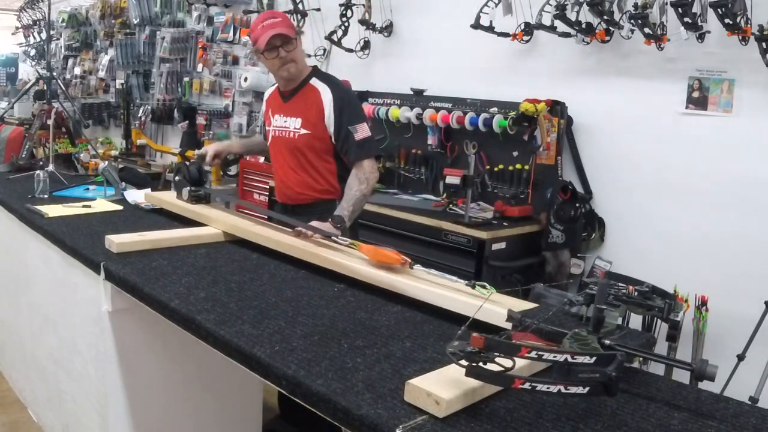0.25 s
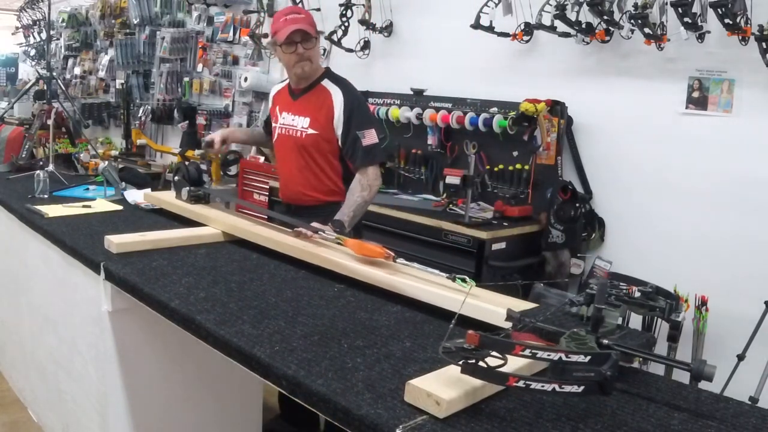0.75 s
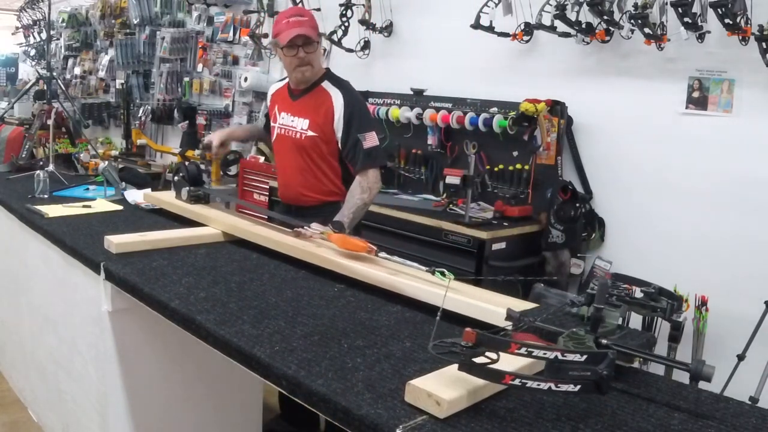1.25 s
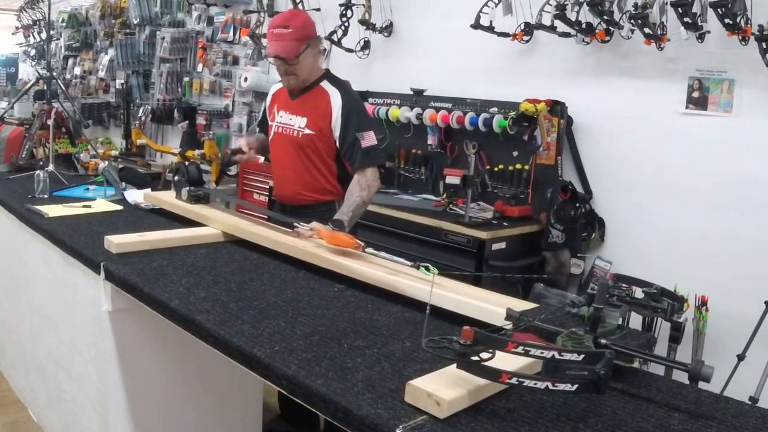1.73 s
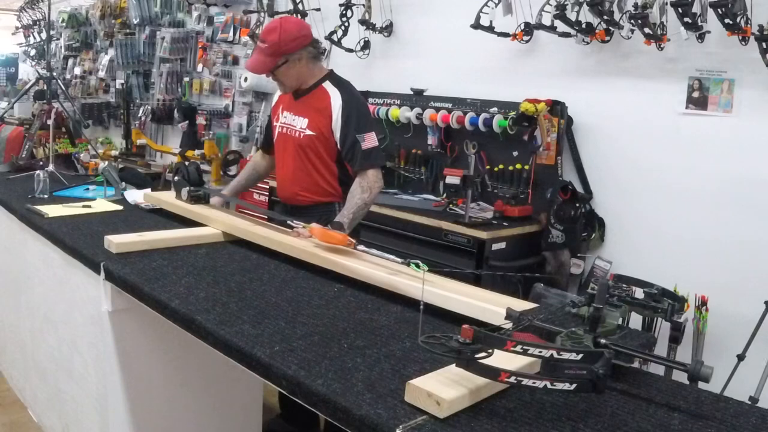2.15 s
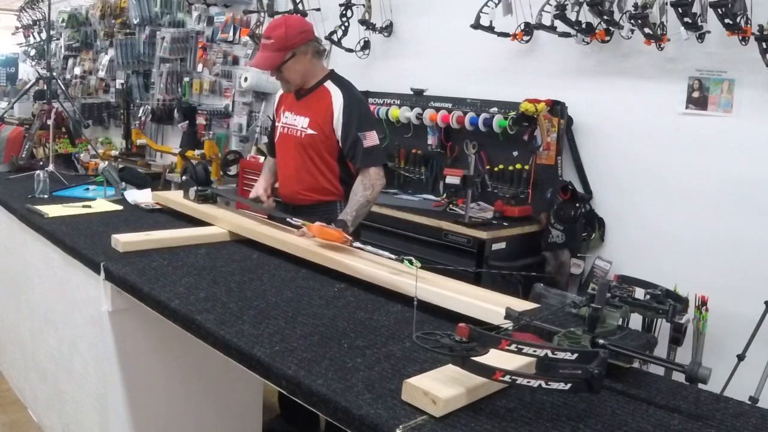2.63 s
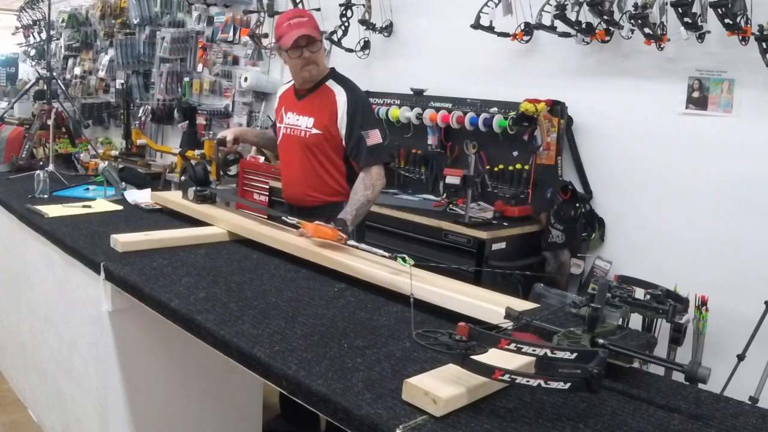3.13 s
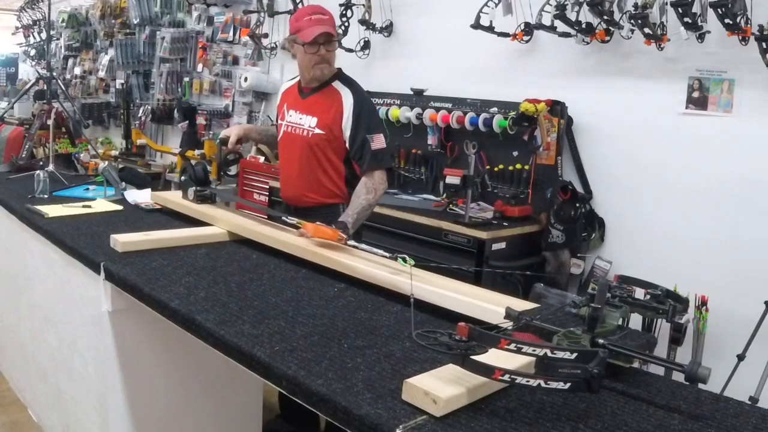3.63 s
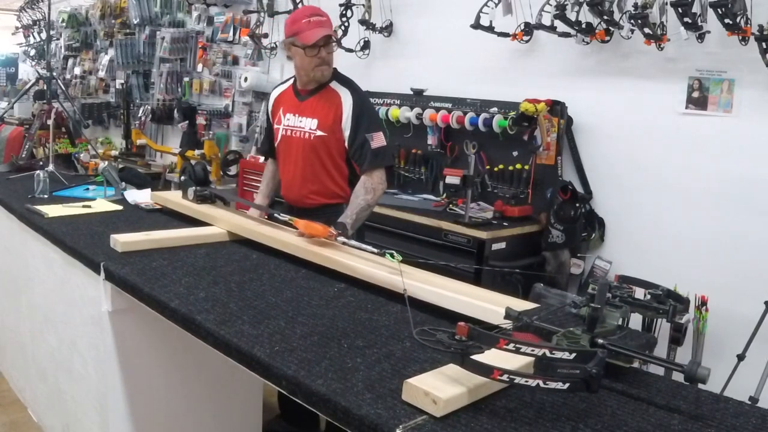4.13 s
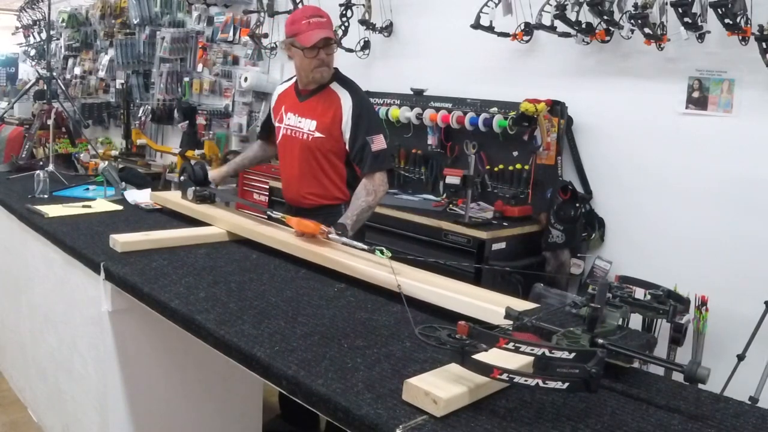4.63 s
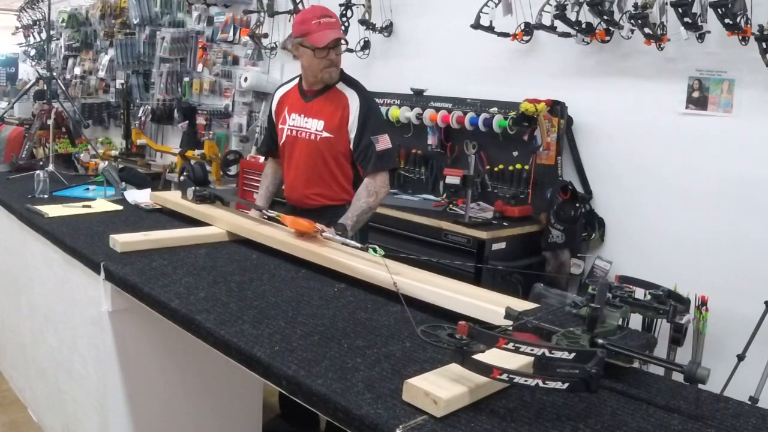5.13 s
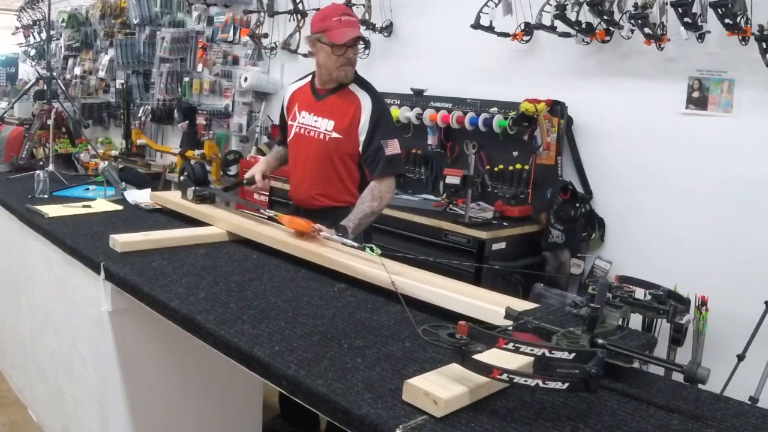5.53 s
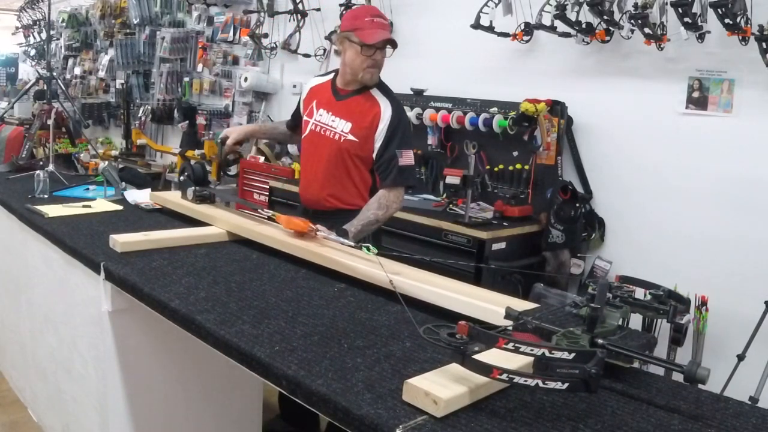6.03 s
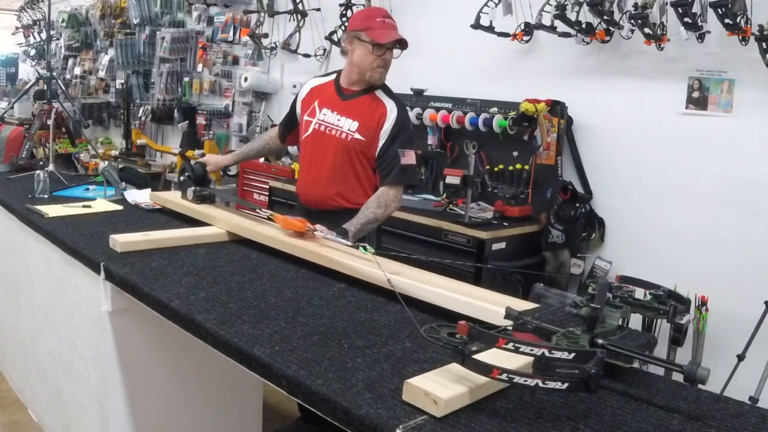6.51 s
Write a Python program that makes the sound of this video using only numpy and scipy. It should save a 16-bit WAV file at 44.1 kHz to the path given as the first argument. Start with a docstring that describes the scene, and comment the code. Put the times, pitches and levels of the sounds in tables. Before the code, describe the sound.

In a quiet workshop, a steel pawl snaps rapidly over the teeth of a hand-cranked winch. The bright, ringing clicks slacken and break off for a moment. Cranking resumes at a moderate pace, then grows steadily slower until each click stands alone, with soft knocks from the crank and the wooden base. The clicks sound clear, with a little room reverberation over a faint steady rumble and hiss.

```python
"""Hand winch drawing a bow

A winch on a wooden draw board in a workshop: quick cranking, a pause, then ever slower clicks.
At each tooth the pawl rubs up the flank and snaps down, ringing itself, the steel frame
and the board. Faster teeth hit harder, and each push of the hand deepens the knock.
The room answers every click over a faint ventilation rumble."""
import sys
import numpy as np
from scipy import signal
from scipy.fft import rfft, irfft, next_fast_len
from scipy.io import wavfile
from scipy.ndimage import uniform_filter1d

SR = 44100
rng = np.random.default_rng(int(sys.argv[2]) if len(sys.argv) > 2 else 0)


def unload_wav(signal):
    """Save mono or channel-first audio to the path in sys.argv[1] as 16-bit WAV at rate SR, clipped to [-1, 1]."""
    wavfile.write(
        sys.argv[1],
        SR,
        np.round(np.clip(np.atleast_2d(signal).T, -1, 1) * 32767).astype(np.int16),
    )


N = 298204
LEAD_S = 0.08
T = np.arange(SR // 2) / SR - LEAD_S  # time around one contact, s

DROPS = [(0.0231, 0.5, 1485), (0.093, 0.5, 1500), (0.156, 2.5, 1434), (0.2226, -2, 1456),
         (0.2903, 4.5, 1470), (0.3521, 3.5, 1403), (0.411, 1.5, 1447), (0.4608, 1, 1414),
         (0.506, 2.5, 1450), (0.5534, -2.5, 1480), (0.6064, 0, 1456), (0.6598, -8.5, 1540),
         (0.7127, -5.5, 1440), (0.76, -6.5, 1380), (0.8097, 2.5, 1440), (0.8645, 3.5, 1360),
         (0.9139, 2, 1360), (0.9577, -2.5, 1386), (0.9957, -2.0, 1280), (1.0396, -2.5, 1457),
         (1.0917, -1.5, 1390), (1.149, -5, 1480), (1.2042, 2.5, 1334), (1.2544, -6, 1496),
         (1.3111, 4, 1510), (1.3737, 0.5, 1364), (1.429, 3.0, 1445), (1.4819, 3.5, 1505), (1.5407, 3, 1436),
         (1.604, 4, 1543), (1.6622, -0.5, 1426), (1.7297, 0, 1566), (1.806, -2, 1470), (1.906, 3, 1440),
         (2.0184, -6.0, 1405), (2.115, -3.5, 1400), (2.203, 3.0, 1483), (2.3041, 3, 1493),
         (2.4806, -0.5, 1530), (2.6014, -0.5, 1560), (2.6917, -0.5, 1500), (2.78, -1, 1466),
         (2.9097, -1, 1470), (3.7597, 1.5, 1460), (3.8298, 2, 1474), (3.891, 1.5, 1470),
         (3.9528, 2.5, 1470), (4.0125, 2, 1477), (4.0954, 0.0, 1535), (4.1822, 2, 1382), (4.2693, -2, 1535),
         (4.365, 0.5, 1434), (4.435, -3.5, 1330), (4.5135, -3, 1450), (4.6, 0, 1462), (4.6862, -3, 1410),
         (4.7912, -0.5, 1430), (4.9365, 0.0, 1410), (5.1232, 2.5, 1377), (5.353, 1.5, 1510),
         (5.576, 2.5, 1403), (5.8303, 2, 1525), (6.0731, 2, 1446), (6.3352, 4.5, 1376), (6.624, 3.5, 1484)]  # pawl drops: t/s, ring level/dB, ring f/Hz
CLICK_EQ = [(400, -15), (900, -15), (1400, -16.5), (2600, -16), (5000, -17), (12000, -17.5)]  # click gain at the easy pace: f/Hz, level/dB
SPEED_EQ = [(600, 3), (1000, 3), (1500, 2.1), (2800, 0.56), (5000, 2.03), (10000, 0.97)]  # gain per doubling of tooth rate: f/Hz, level/dB
PUSH_SHARE = [(150, 0.66), (400, 0.97), (950, 0.94), (1350, 0.27)]  # weight of the hand's push: f/Hz, share
RING_SHARE = [(500, .2), (1000, 0.3), (1280, .9), (1650, 0.87), (2000, .15), (3000, 0.03)]  # weight of a drop's ring level: f/Hz, share
def ratchet(easy_teeth_per_s=10, push_db_per_rate=0.47):
    """One click a tooth: crank speed sets its weight, the way the pawl lands sets its ring."""
    # already turning: one tooth drops just before t = 0
    earlier = (2 * DROPS[0][0] - DROPS[1][0], *DROPS[0][1:])
    times, ring_db, ring_hz = np.transpose([earlier, *DROPS])
    count = len(times)
    rate = tooth_rate(times)[:, None]
    speed = np.log2(rate / easy_teeth_per_s)
    push_db = push_db_per_rate * (rate - uniform_filter1d(rate, size=7, axis=0))
    strike = pawl_strike(count)
    ring = later(amp(-7) * pawl_ring(ring_hz) + amp(-12) * frame_ring(count), 0.002)
    overtones = amp(-16.5) * shimmer(count)
    wall_echo = amp(-11.5) * later(strike, 0.019)
    clicks = strike + ring + overtones + wall_echo + amp(-9.5) * room(count)
    effort_db = lambda hz: speed * along(SPEED_EQ, hz) + push_db * along(PUSH_SHARE, hz)
    landing_db = lambda hz: ring_db[:, None] * along(RING_SHARE, hz)
    clicks = filtered(clicks, lambda hz: amp(along(CLICK_EQ, hz) + effort_db(hz) + landing_db(hz)))
    return place(times, clicks + board_hum(speed) + flank_rub(speed))


def pawl_strike(count):
    """The pawl lands: a short, rough rattle with a quick soft rise and a bright crack at its peak."""
    rattle = snap(count, rise_s=0.015, fall_s=0.047, spiky_db=2.5, scatter_db=2.5)
    rattle = coloured(rattle, [(5500, 0.5), (8000, -17.5)])
    crack = snap(count, rise_s=0.008, fall_s=0.014, spiky_db=2, scatter_db=4)
    crack = blow(coloured(crack, [(2000, -21), (5500, -3), (7500, -0.5)]))
    return amp(-8) * rattle + amp(-11) * crack


STEEL_SPECTRUM = [(60, -41.5), (300, -34.5), (800, -10), (2400, -12), (4000, -4), (5900, -16), (9000, -9),
                  (10700, -20), (15300, -22)]  # steel on steel: f/Hz, level/dB
WHEEL_PEAKS = [(430, 41, -4), (648.5, 47, 3), (900, 91, 3.5), (1070, 30, 6), (1440, 290, 6.5),
               (2165, 310, 6.5), (2490, 330, 1.5), (3240, 380, 0), (4480, 1200, -2.5), (6990, 870, -9.5),
               (8320, 600, -7), (12340, 790, -18)]  # ratchet wheel and mount: f/Hz, width/Hz, level/dB
def snap(count, rise_s, fall_s, spiky_db, scatter_db):
    """A burst of tiny impacts on the wheel; where they land favours one resonance or another."""
    shape = (count, len(T))
    impacts = rng.standard_normal(shape) * amp(spiky_db * rng.standard_normal(shape))
    favour_db = scatter_db * rng.standard_normal((count, len(WHEEL_PEAKS), 1))

    def wheel(hz):
        power = amp(along(STEEL_SPECTRUM, hz)) ** 2
        for k, (centre, width, db) in enumerate(WHEEL_PEAKS):
            peak = 1 / (1 + 2 * ((hz - centre) / width) ** 2)
            power = power + (amp(db + favour_db[:, k]) * peak) ** 2
        return np.sqrt(power)

    burst = impacts * swell(rise_s, fall_s)
    short = int(2 * LEAD_S * SR)
    sound = filtered(burst[:, :short], wheel)
    return blow(np.pad(sound, ((0, 0), (0, len(T) - short))))


PAWL_MODES = [(.78, -13, .05), (.93, -8, .036), (1.025, 0, .042), (5.85, -15, .05)]  # pawl: f/ring f, level/dB, t60/s
def pawl_ring(ring_hz):
    """The pawl rings briefly, at its own pitch for each drop."""
    tunings = [[(hz * ratio, db, t60) for ratio, db, t60 in PAWL_MODES] for hz in ring_hz]
    return np.vstack([modes(tuning, 1, rise_s=0.0037, scatter_db=2) for tuning in tunings])


FRAME_MODES = [(644, -9, .13), (711, -8, .14), (877, -8, .13), (915, -10, .13), (1080, -7, .13),
               (1139, -6, .13), (1286, 0, .17), (1345, -2, .16), (1412, 2, .23), (1485, -2, .28),
               (1560, 1, .17), (1674, -4, .16), (1807, -5, .16), (1943, -10, .3), (2008, -6, .18),
               (2150, -8, .16), (2313, -6, .24), (2374, -8, .29), (2476, -7, .33), (2551, -4, .19),
               (2754, -8, .23), (2993, -9, .17), (3400, -12, .19), (4205, -9, .18), (4414, -9, .26),
               (4866, -11, .23), (4995, -10, .23), (8387, -8, .22), (8480, -11, .22), (8950, -12, .17),
               (9300, -14, .2)]  # winch frame: f/Hz, level/dB, t60/s
def frame_ring(count):
    """The steel frame rings on after each strike."""
    return modes(FRAME_MODES, count, rise_s=0.013, scatter_db=4)


def shimmer(count, max_t60_s=0.25):
    """Thin overtones of gear, spring and drum, coloured and damped like the room's tail."""
    hz = rng.uniform(2200, 13000, size=90)
    t60 = np.minimum(max_t60_s, along(ROOM_DECAY, hz))
    overtones = np.transpose([hz, along(ROOM_SPECTRUM, hz), t60])
    return modes(overtones, count, rise_s=0.006, scatter_db=4)


BOARD_MODES = [(133, -7, 0.25), (202.6, -2.5, 0.31), (227.5, 1, 0.49), (246.3, -7, 0.38), (290, -13, .35),
               (401.5, 6, 0.08), (457.8, 3.5, 0.12)]  # wooden board: f/Hz, level/dB, t60/s
def board_hum(speed, full_draw_db=7):
    """The farther the bow is drawn, the better the taut cable passes each click into the board."""
    draw = np.linspace(0, 1, len(speed))[:, None]
    hum = later(modes(BOARD_MODES, len(speed), rise_s=0.02, scatter_db=2), 0.003)
    return amp(-42.5 + full_draw_db * draw ** 3 + 1.4 * speed) * hum


RUB_SPECTRUM = [(40, -6), (200, -8.5), (420, 5), (700, -6), (1300, 1), (2500, -21.5), (6000, -39),
                (15000, -53)]  # dull contact noise: f/Hz, level/dB
def flank_rub(speed):
    """The pawl rubs up the tooth's flank before it drops."""
    friction = noise(RUB_SPECTRUM, (len(speed), len(T)))
    fade_in = np.clip(1 + T / LEAD_S, 0, 1)
    return amp(-43.5 + speed) * blow(friction * swell(rise_s=0.2, fall_s=0.062) * fade_in)


CRANK_KNOCKS = [(0.962, -26, -49), (1.003, -32, -50), (2.566, -35, -51.5), (3.68, -54, -68),
                (3.728, -45, -60)]  # contacts in the crank: t/s, thud level/dB, tick level/dB
def crank_play(slow_teeth_per_s=6, ahead_s=0.049, db_per_doubling=16.5):
    """Play in the crank knocks and ticks; before slow teeth a slower hand takes it up more gently."""
    drops = np.transpose(DROPS)[0]
    take_ups = [(t - ahead_s, -45.5 + db_per_doubling * np.log2(rate / slow_teeth_per_s), -71)
                for t, rate in zip(drops, tooth_rate(drops)) if rate < slow_teeth_per_s]
    times, thud_db, tick_db = np.transpose([*CRANK_KNOCKS, *take_ups])
    count = len(times)
    thud = blow(noise(RUB_SPECTRUM, (count, len(T))) * swell(rise_s=0.039, fall_s=0.11))
    wood = amp(-9.5) * modes(BOARD_MODES, count, rise_s=0.022, scatter_db=0)
    tick = snap(count, rise_s=0.006, fall_s=0.05, spiky_db=2, scatter_db=2)
    return place(times, amp(thud_db[:, None]) * (thud + wood) + amp(tick_db[:, None]) * tick)


ROOM_SPECTRUM = [(40, -17.5), (150, -12), (420, -8.5), (550, -7.5), (800, -2.5), (1500, 4), (1850, 4),
                 (2300, 1.5), (3400, -6), (4700, -2), (5800, -7.5), (7600, -9), (8500, -5), (10700, -15.5),
                 (15300, -18)]  # workshop reverberation: f/Hz, level/dB
ROOM_DECAY = [(150, 0.9), (400, .32), (1000, 0.26), (2400, 0.3), (5000, 0.25), (8500, 0.23), (14000, 0.18)]  # its main decay: f/Hz, t60/s
def room(count, build_s=0.003, early_db=-1.5, early_t60_s=0.17, late_db=-12):
    """A tail for each click: bench and near walls thicken its start, the far shop prolongs its end."""
    # the winch stays put, so all clicks share part of the echo pattern
    shared = filtered(noise(ROOM_SPECTRUM, (1, len(T))),
                      lambda hz: along([(1200, 0.3), (3500, 1.05)], hz))
    fresh = filtered(noise(ROOM_SPECTRUM, (count, len(T))),
                     lambda hz: along([(1200, 1.2), (3500, 0.7)], hz))
    hz, t, spectra = signal.stft(shared + fresh, SR, nperseg=256)
    fall_db = -60 * np.maximum(t - LEAD_S, 0) / along(ROOM_DECAY, hz)[:, None]
    decay = np.hypot(amp(fall_db), amp(late_db + fall_db / 2))
    tail = signal.istft(spectra * decay, SR, nperseg=256)[1][:, :len(T)]
    age_s = np.maximum(T, 0)
    onset = 1 - np.exp(-age_s / build_s)
    early_boost = 1 + amp(early_db - 60 * age_s / early_t60_s)
    return blow(tail * onset * early_boost)


AIR_SPECTRUM = [(15, -30), (30, -17), (43, -9), (64, -13), (90, -18), (128, -11.5), (160, -23), (330, -25),
                (770, -32.5), (3000, -39.5), (15000, -46.5)]  # ventilation and hiss: f/Hz, level/dB
def ventilation():
    """Steady rumble under a faint hiss."""
    return amp(-63.5) * unit(noise(AIR_SPECTRUM, N))


def tooth_rate(times):
    """Teeth per second, from the nearer neighbour so that a pause does not count."""
    gaps = np.diff(times)
    return 1 / np.minimum(np.r_[gaps[0], gaps], np.r_[gaps, gaps[-1]])


def modes(table, count, rise_s, scatter_db):
    """Modes (f/Hz, level/dB, t60/s) struck count times, at new strengths and phases each time."""
    hz, db, t60 = np.transpose(table)[..., None]
    gain = amp(db.T + scatter_db * rng.standard_normal((count, len(hz))))
    phase = rng.uniform(0, 2 * np.pi, gain.shape)
    angle = 2 * np.pi * hz * T
    envelope = swell(rise_s, t60)
    sines = (gain * np.cos(phase)) @ (envelope * np.sin(angle))
    cosines = (gain * np.sin(phase)) @ (envelope * np.cos(angle))
    return blow(sines + cosines)


def swell(rise_s, fall_s):
    """Envelope: up 60 dB in rise_s before the contact, down 60 dB in fall_s after it."""
    return amp(60 * np.minimum(T / rise_s, -T / fall_s))


def place(times, sounds):
    """Lay each sound at its contact time."""
    track = np.zeros(N + 2 * SR)
    for t, sound in zip(times, sounds):
        start = SR + round((t - LEAD_S) * SR)
        track[start:start + len(T)] += sound
    return track[SR:SR + N]


def amp(db):
    """Decibels to gain."""
    return 10 ** (np.asarray(db) / 20)


def unit(x):
    """Scale to rms 1."""
    return x / np.sqrt(np.mean(x ** 2) + 1e-20)


def blow(x):
    """Give each row the energy of 20 ms at rms 1."""
    return x * np.sqrt(SR / 50 / (np.sum(x ** 2, -1, keepdims=True) + 1e-20))


def along(points, hz):
    """Interpolate (f/Hz, value) points on a log axis."""
    freqs, values = np.transpose(points)
    return np.interp(np.log(hz + 1), np.log(freqs + 1), values)


def filtered(x, response):
    """Apply a frequency response to each row."""
    n = x.shape[-1]
    padded = next_fast_len(n + 2048)
    hz = np.fft.rfftfreq(padded, 1 / SR)
    return irfft(rfft(x, padded) * response(hz), padded)[..., :n]


def coloured(x, spectrum):
    """Filter by (f/Hz, level/dB) points."""
    return filtered(x, lambda hz: amp(along(spectrum, hz)))


def noise(spectrum, shape):
    """Coloured Gaussian noise."""
    return coloured(rng.standard_normal(shape), spectrum)


def later(x, delay_s):
    """Delay each row."""
    return filtered(x, lambda hz: np.exp(-2j * np.pi * hz * delay_s))


def scene():
    """The winch in the quiet workshop, mono."""
    return (ratchet() + crank_play() + ventilation())[None]


CEILING, CUTOFF_HZ = 0.85, 15280
def record(dry):
    """Soft-clip the highest peaks, then low-pass steeply."""
    rounded = dry / (1 + (dry / CEILING) ** 6) ** (1 / 6)
    return filtered(rounded, lambda hz: 1 / np.sqrt(1 + (hz / CUTOFF_HZ) ** 400))


dry = scene()
out = record(dry)
unload_wav(out)
```